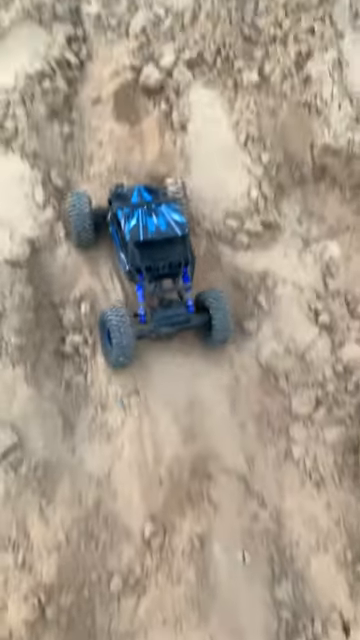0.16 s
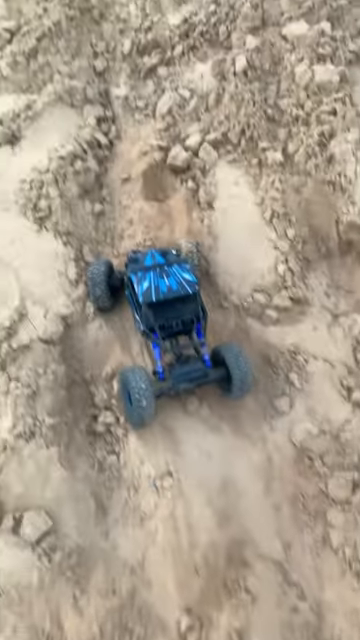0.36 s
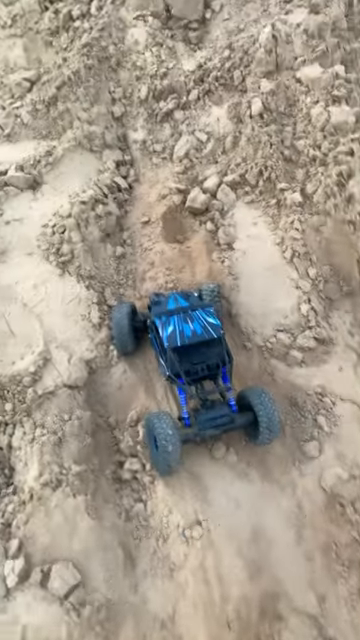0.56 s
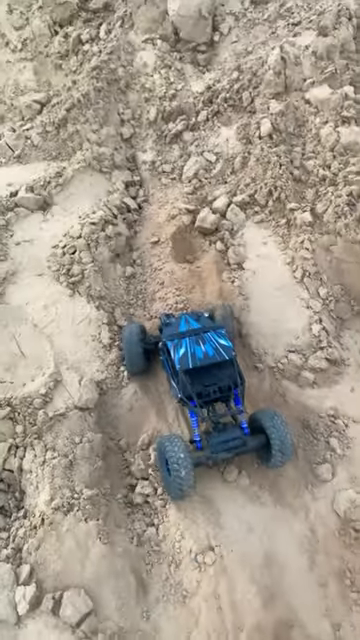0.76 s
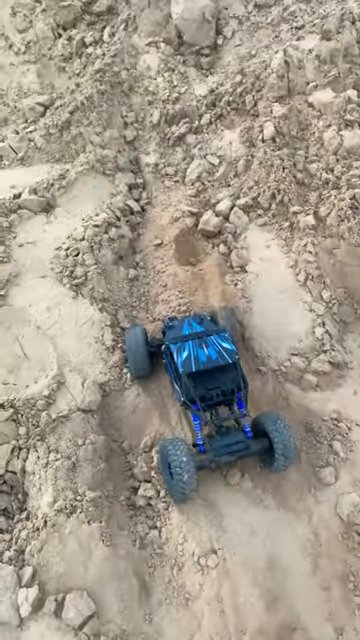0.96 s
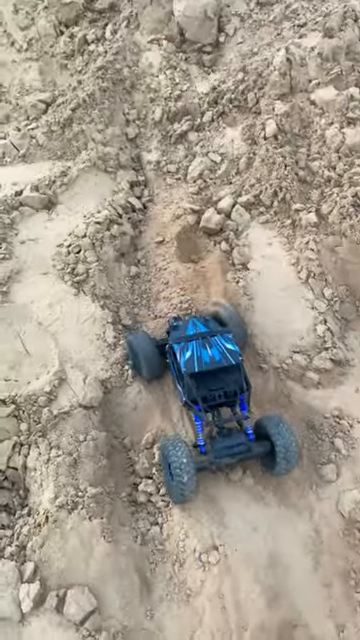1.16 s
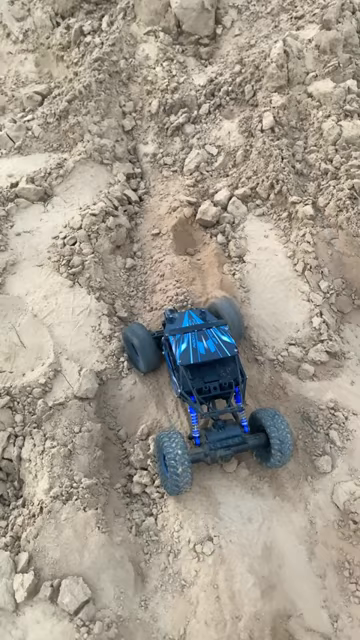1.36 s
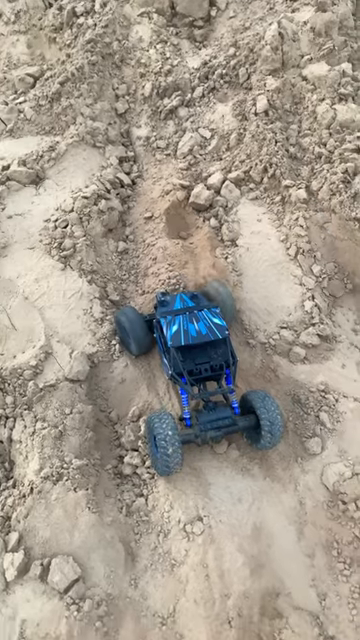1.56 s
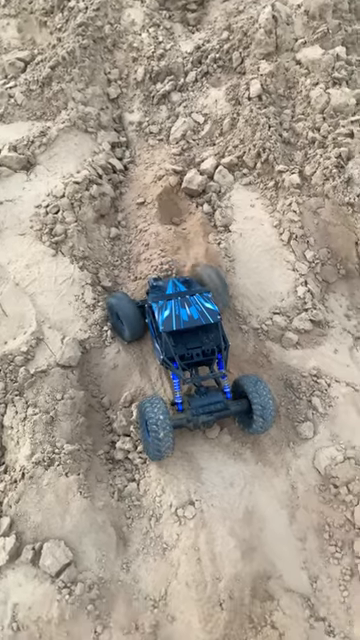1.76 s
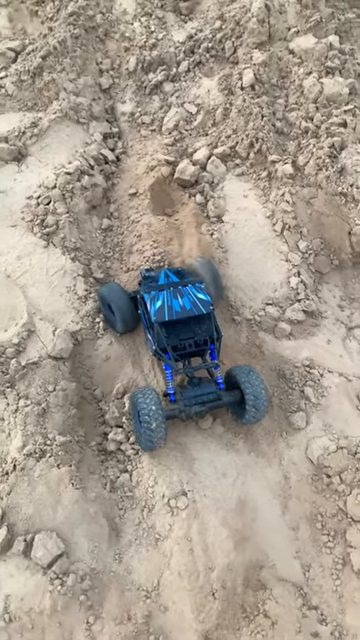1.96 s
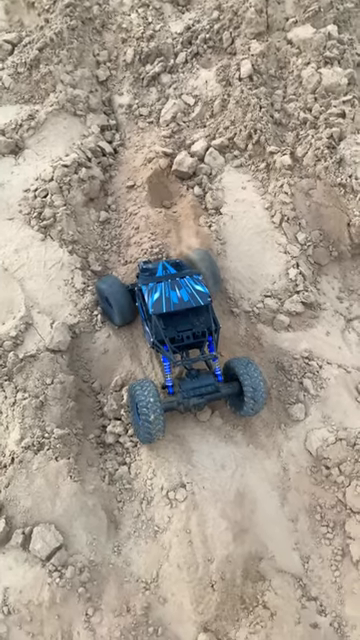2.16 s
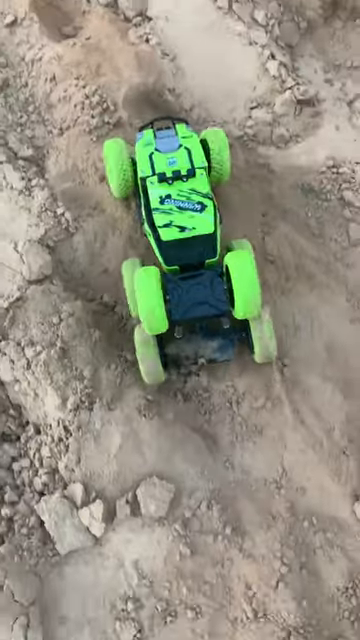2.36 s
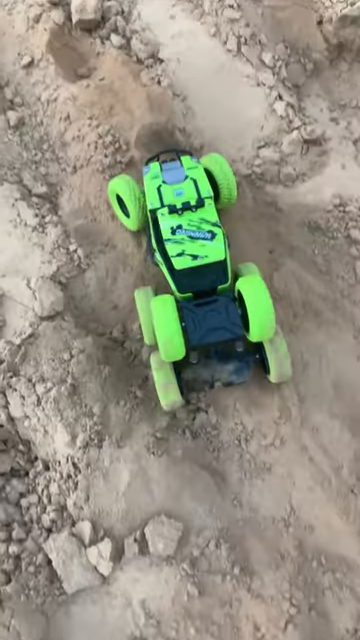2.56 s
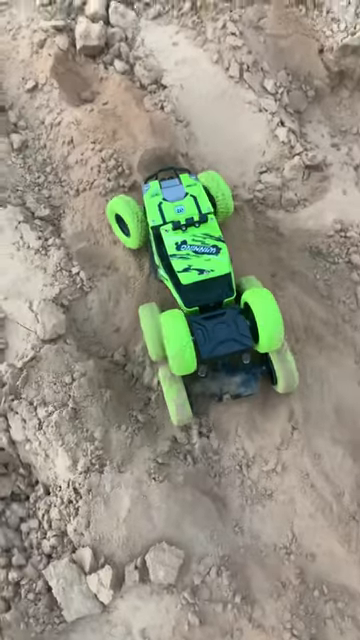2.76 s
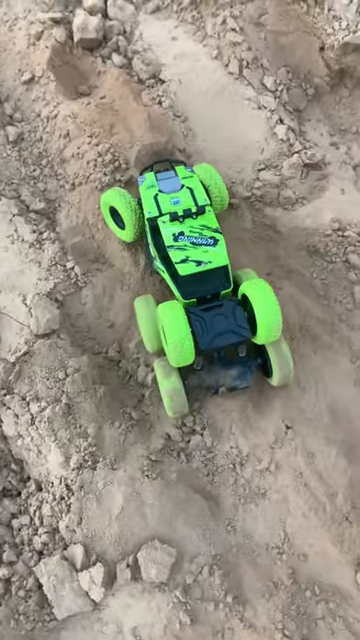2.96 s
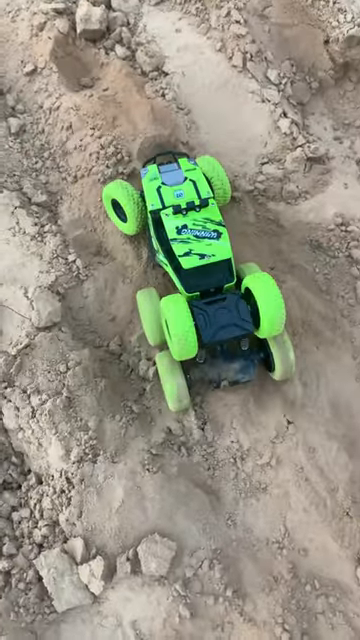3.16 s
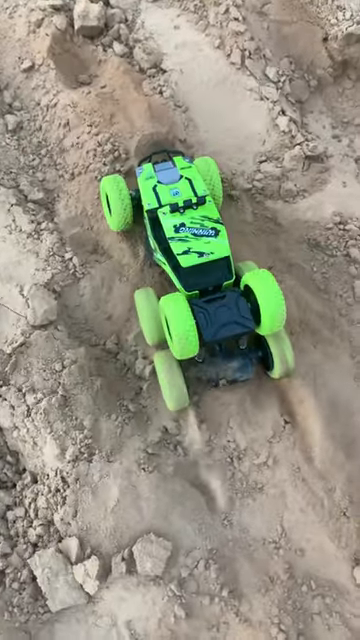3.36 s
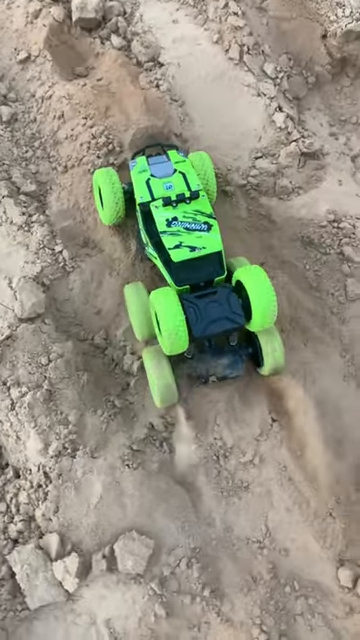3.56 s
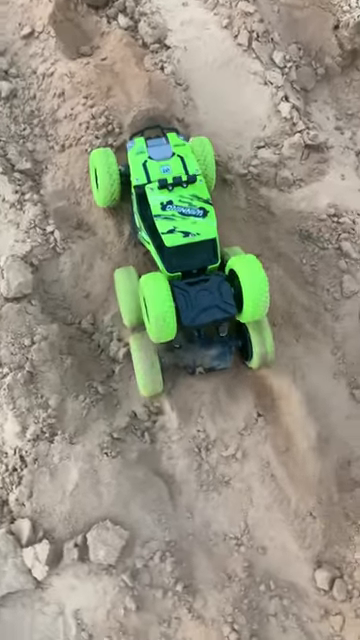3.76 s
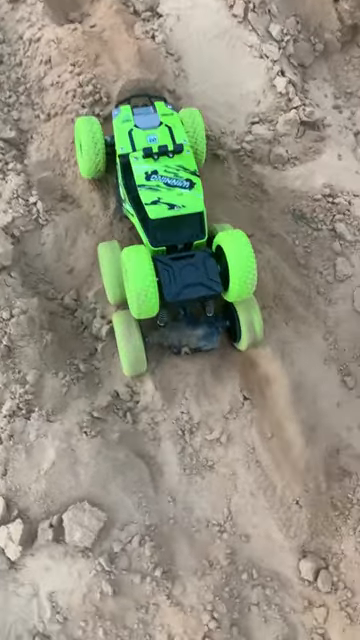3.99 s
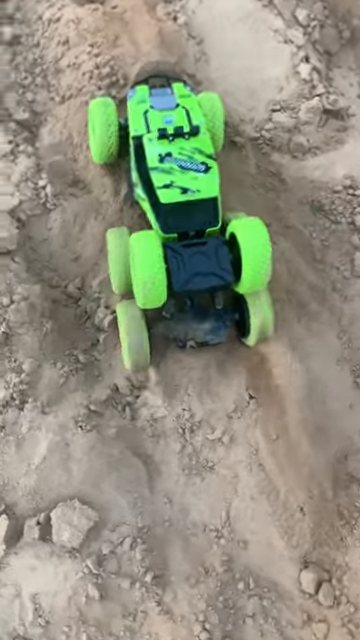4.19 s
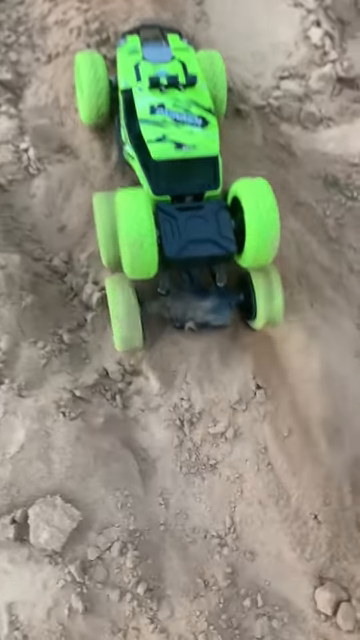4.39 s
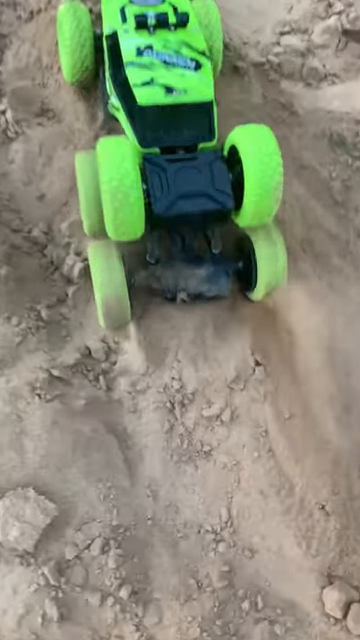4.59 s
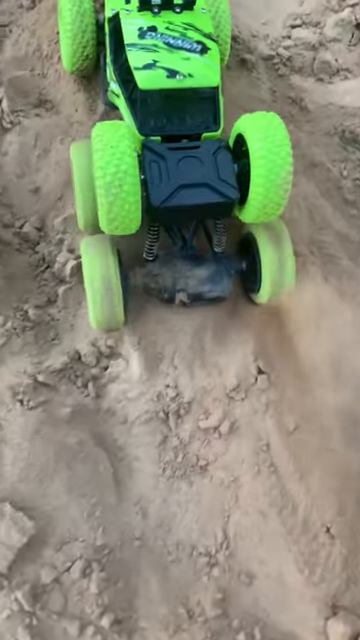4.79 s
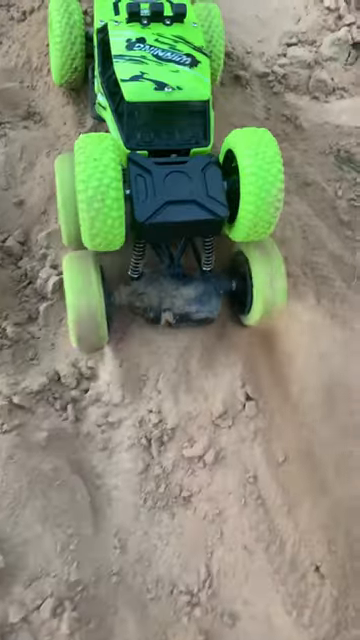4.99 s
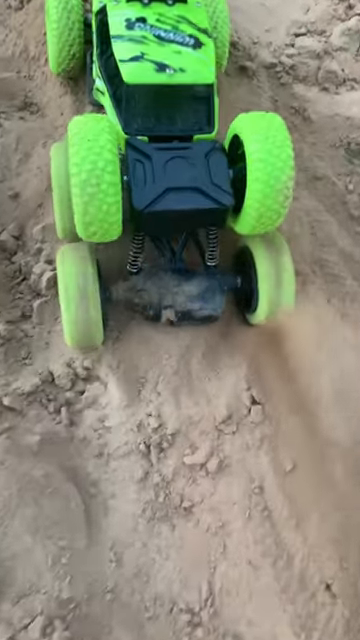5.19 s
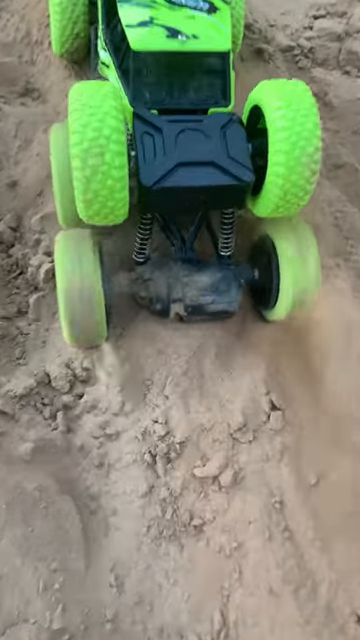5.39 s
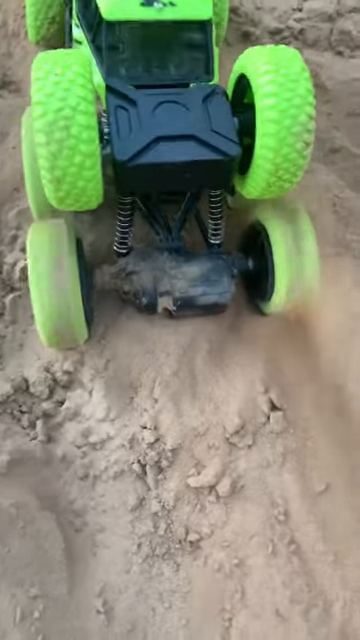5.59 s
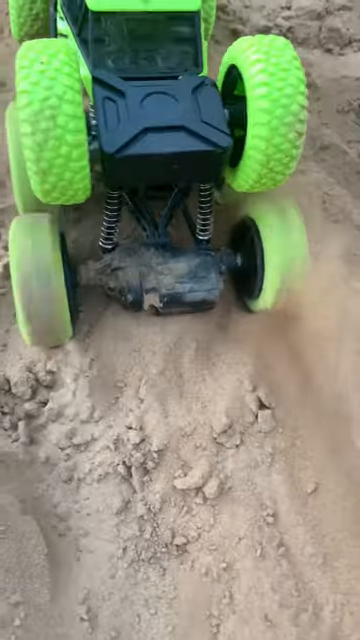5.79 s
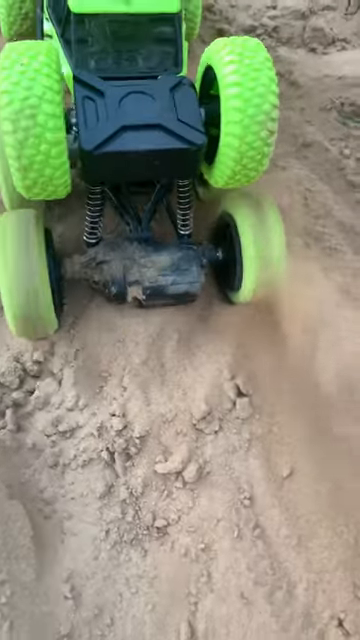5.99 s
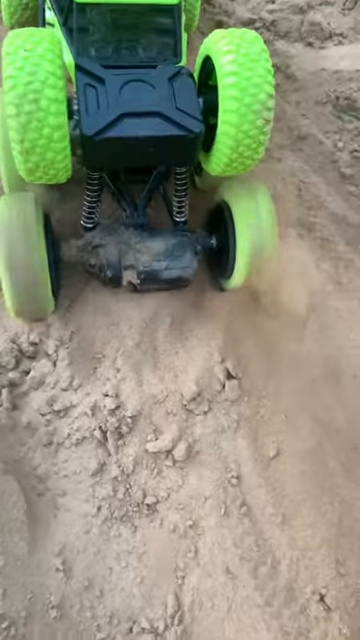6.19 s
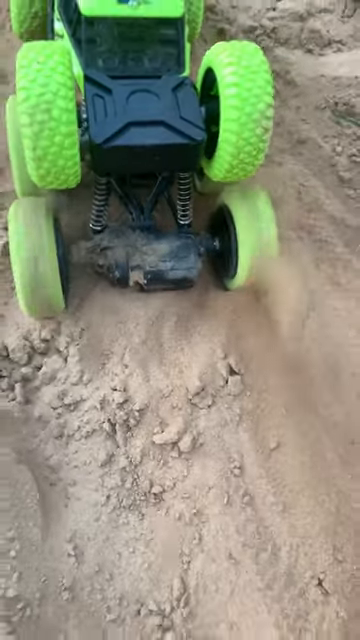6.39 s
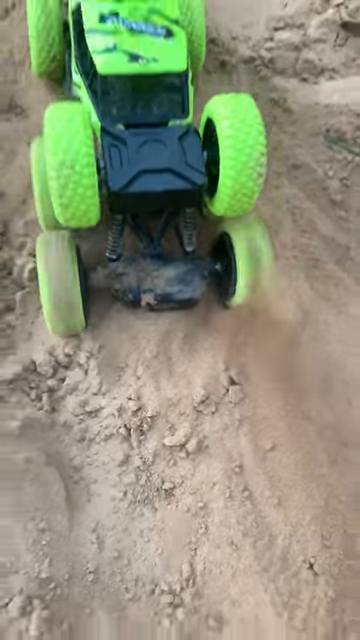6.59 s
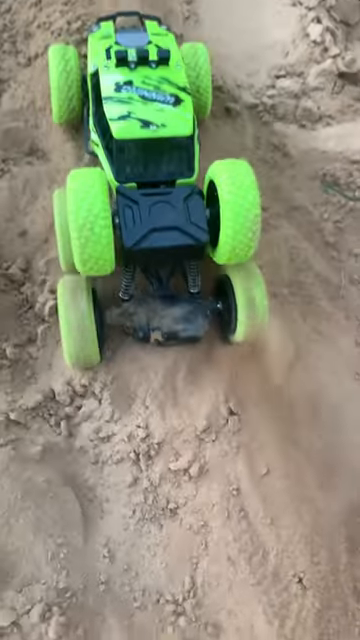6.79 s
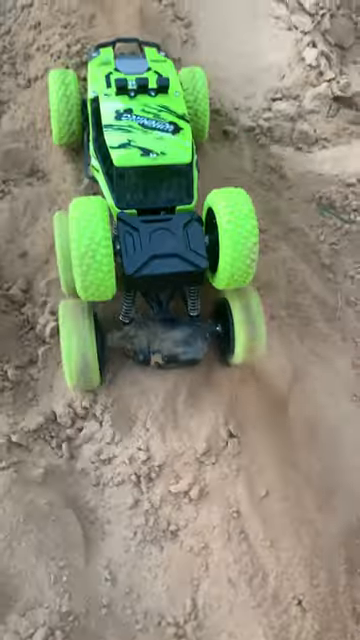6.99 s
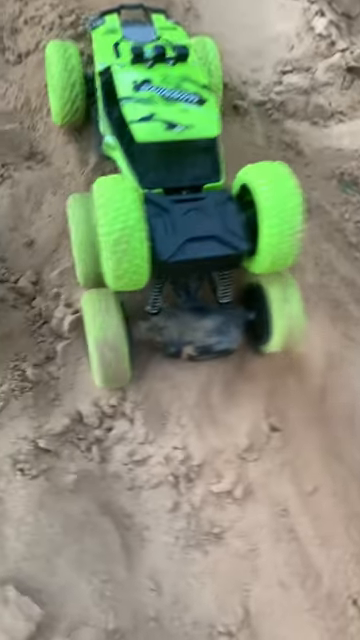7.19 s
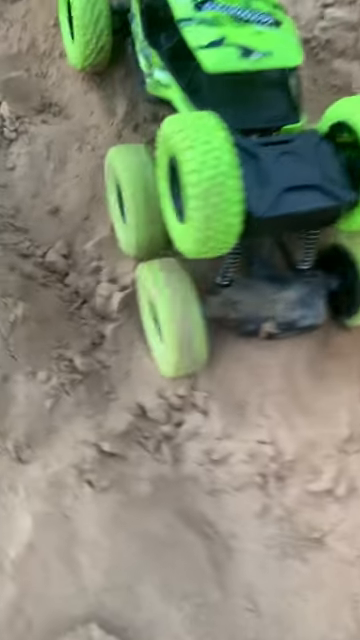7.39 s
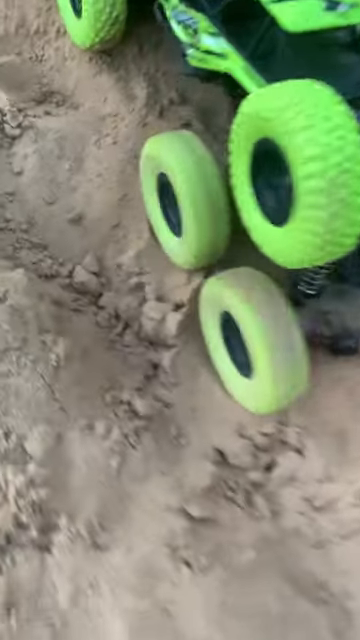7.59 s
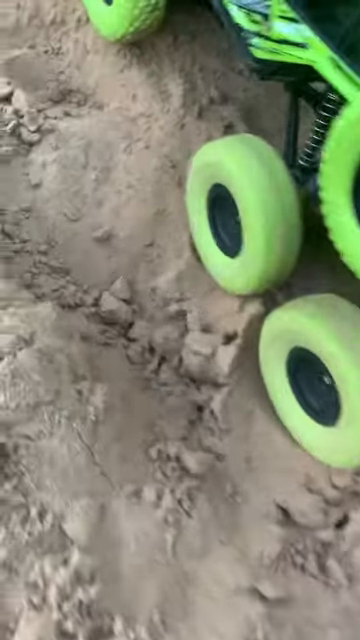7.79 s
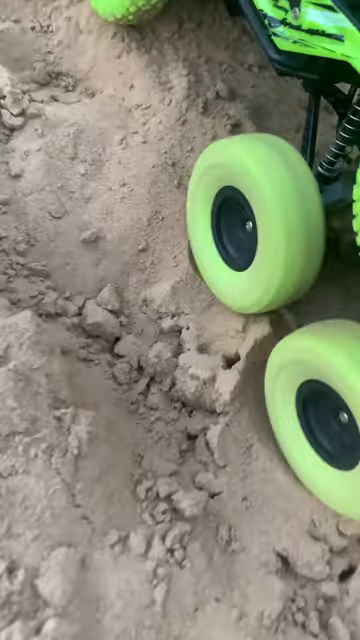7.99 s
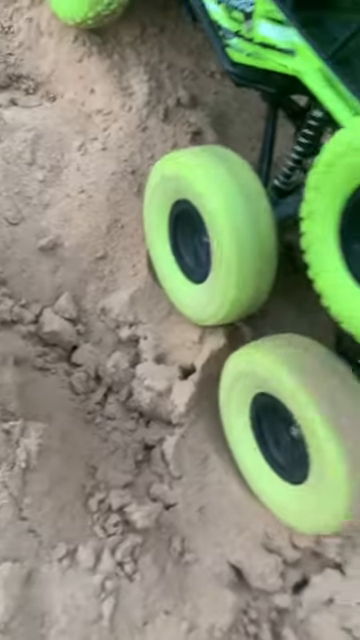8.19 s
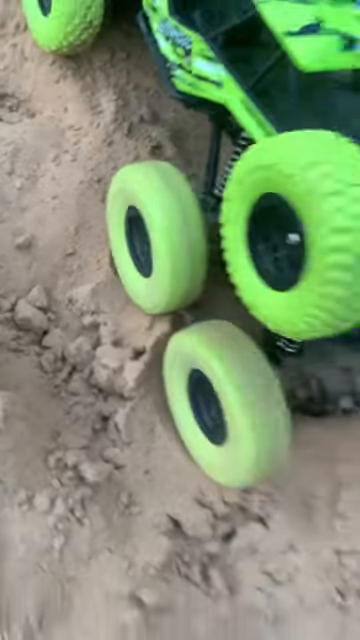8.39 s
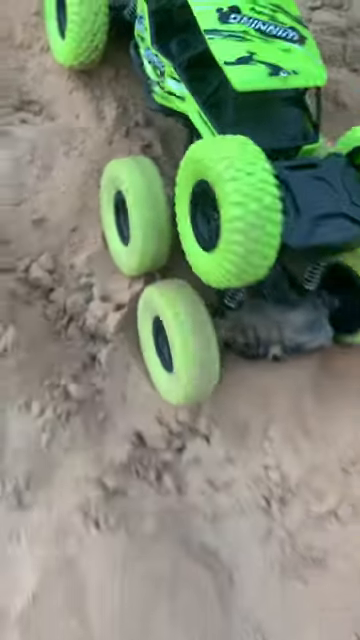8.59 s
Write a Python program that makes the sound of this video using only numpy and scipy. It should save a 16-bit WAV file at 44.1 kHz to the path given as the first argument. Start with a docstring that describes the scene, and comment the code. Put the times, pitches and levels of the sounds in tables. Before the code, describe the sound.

Two toy cars labour on a dusty slope: first gritty tyre scrapes with whining slips, then a throbbing plastic gear rattle growing close and loud.

```python
"""Two toy crawlers on a dusty slope

Close to a two-port microphone, the first car labours in bursts: its tyres scrape grit and its gear whine
shoots up at each slip and sags under load. The second fades in, falters twice, then spins its wheels faster and
nearer, plastic gears rattling, whining and hissing in time with motor, gear and wheel, with extra bright hiss
while it is loud. Knocks ring the plastic and the chassis thuds; behind them lie a distant engine's exhaust
tones, a thin hum and open-air noise.
"""
import sys
import numpy as np
from scipy import signal
from scipy.fft import rfft, irfft, next_fast_len
from scipy.io import wavfile

SR = 44100
rng = np.random.default_rng(int(sys.argv[2]) if len(sys.argv) > 2 else 0)


def output_pcm(signal):
    """Save a mono or channel-first signal as 16-bit PCM at the path in sys.argv[1].

    Samples are clipped to [-1, 1] before scaling.
    """
    pcm = np.clip(np.atleast_2d(signal).T, -1, 1) * 32767
    wavfile.write(sys.argv[1], SR, np.round(pcm).astype(np.int16))


N = 381465
TIME = np.arange(N) / SR
SWAP_S = 2.325  # the first car hands over to the second
SWAP_SAMPLE = round(SWAP_S * SR)

# Second car's drive gear. Each row: time in seconds, turns per second.
GEAR_SPEED = [(2.4, 42), (2.6, 35), (3.07, 37), (3.2, 41.15), (3.6, 43.33), (4.15, 44.13), (4.4, 48.57),
              (4.8, 49.73), (5.5, 49.96), (6.1, 50.38), (6.6, 51.39), (7.2, 52.09), (8.65, 52.02)]
GEAR_TEETH, PINION_TEETH = 37, 9
WHEEL_RATIO = .1604  # wheel turns per gear turn
WHEEL_PHASE_S = 3.2  # gear turns are counted from here
WHEEL_DRAG, GEAR_WOBBLE_TURNS = .0035, .0011  # share of the speed; gear turns
# Dips of speed and level: a short fade-in as the second car enters, then two brief falterings.
# Each row: centre in seconds, depth in dB, ramp either side in seconds.
DIPS = [(2.325, 18, 0.03), (2.911, 12, 0.04), (2.957, 22, 0.04)]
DIP_SPEED_LOSS = .46  # share of the speed lost at the bottom
# Loudness as it gains speed and its distance changes. Each row: time in seconds, level in dB.
APPROACH = [(2.37, -11), (2.5, -14.5), (3.1, -13), (4.15, -7), (4.55, -2.5), (6.1, 1), (6.85, -2.5),
            (7.7, 2), (8.65, 1)]
# How hard its teeth bind, bringing out the whine. Each row: time in seconds, added whine in dB.
BINDING = [(2.9, -14), (4.1, -5), (4.6, -4.5), (5.9, -3), (7, -1), (7.95, -4.5), (8.65, 3)]
RATTLE_DB, WHINE_DB, HISS_DB = -34.5, -34, -30.5  # where approach and binding stand at 0 dB
RATTLE_FOLLOWS, WHINE_FOLLOWS = 0.64, 0.4  # shares of the approach in dB
RATTLE_GEAR_DB, RATTLE_MOTOR_DB = 3.4, 1.7  # weights of gear load and motor load
RUB_GEAR_DB, RUB_MOTOR_DB = 2.2, 1.9
# Plastic housing resonances. Each row: centre in Hz, width in Hz, relative gain in dB.
HOUSING = [(1260, 166, -3.5), (1530, 250, 1), (1820, 247, 0), (2200, 370, -3.5), (3513, 390, -3.5)]
# Housing flank, heard side-on. Each row: centre in Hz, width in Hz, relative gain in dB.
FLANK = [(1621, 79, 0)]
FLANK_DB, FLANK_SWING_DB = -34.5, 3.2
# Hiss of its sliding teeth. Each row: frequency in Hz, relative level per Hz in dB.
HISS = [(150, -17), (350, -7.5), (750, -11.5), (1100, -4.5), (2700, -3.5), (3600, 2), (4400, 5.5),
        (5200, -18), (6400, 6), (7250, -12), (8300, 0.5), (9500, -2), (11000, -9.5), (13000, -21.5),
        (15500, -10)]
# The same hiss from side-on. Each row: frequency in Hz, relative level per Hz in dB.
HISS_SIDE_ON = [(150, -9.5), (350, -8), (750, -13), (1100, -5.5), (4300, 0), (5300, -8.5), (5900, 6.5),
                (7800, -4), (8800, 3), (11000, -8.5), (15500, -10.5)]
TURN_S = (6.96, 7.77)  # start and end of its turn side-on
TOOTH_PLAY, TOOTH_JITTER = .2, .2  # lasting and chance errors of place, tooth spacings
TOOTH_SPREAD_DB = 1.2  # lasting unevenness of strength
TOOTH_DB, GRIT_DB = -2, -5.5  # shares of the rattle: teeth meeting, grit in the gears
TICK_HZ, TICK_WIDTH_HZ, TICK_DB = 3350, 120, -35.5  # gear-case ring; level with the approach at 0 dB
# Extra bright hiss while the second car is loud. Each row: time in seconds, level in dB.
BRIGHT_HISS_LEVEL = [(4.2, -73), (4.6, -45.5), (5.5, -37.5), (6.5, -35.5), (7.1, -57), (7.6, -70)]
# Its colour, strong around 5.7 and 7.4 kHz. Each row: frequency in Hz, relative level per Hz in dB.
BRIGHT_HISS = [(2000, -17), (4800, -24), (5700, 9.5), (6400, -31), (7400, 1), (8500, -2), (15000, -26)]

# First car's throttle. Each row: on in seconds, off in seconds.
THROTTLE = [(0, 0.41), (0.595, 0.652), (0.837, 2.32)]
CRAWL_DB, PICK_UP_DB_PER_S, COAST_DB_PER_S = -35, 447, 113  # scraping while the tyres grip
# Its tyres break loose, then bite. Each row: start in seconds, length in seconds, whine and scrape in dB
# before their layer balance.
SLIPS = [(0, 0.066, -45, -36), (0.106, 0.18, -50, -36), (0.647, 0.074, -50, -39),
         (0.913, 0.13, -39.5, -39.5), (1.045, 0.072, -36, -44), (1.175, .11, -38, -38.5),
         (1.468, 0.062, -40, -33.5), (1.678, 0.049, -49, -33.5), (1.899, .025, -57, -31.5),
         (2.091, 0.04, -51, -32.5), (2.29, 0.0085, -60, -33)]
SLIP_RISE_DB_PER_S, SLIP_FALL_DB_PER_S = 348, 250
SQUEAL_EDGE_DB_PER_S = 380  # the whine stands out only around the slips
# Its tooth rate, racing in slips and sagging as the tyres bite. Each row: time in seconds, rate in Hz.
TOOTH_RATE = [(0, 1299), (.55, 986), (.66, 1830), (.8, 995), (.84, 1460), (.925, 2110), (.98, 1996),
              (1.01, 1750), (1.06, 1957), (1.105, 1735), (1.165, 2102), (1.21, 2045), (1.24, 1840),
              (1.285, 1822), (1.47, 2404), (1.51, 2258), (2.3, 2628)]
# Its tyre scrape. Each row: frequency in Hz, relative level per Hz in dB.
FIRST_SCRAPE = [(250, -25), (680, -16), (1000, -1), (1900, -4), (2350, -0.5), (3300, -4.5), (5000, -6),
                (6700, -15), (8200, -9.5), (11500, -12.5), (13000, -34), (15500, -32)]
# Its shell resonances. Each row: centre in Hz, width in Hz, relative gain in dB.
FIRST_SHELL = [(424, 120, -5), (850, 117, 0), (2800, 300, 2)]
# Gearbox whir while it rolls freely at first. Each row: time in seconds, tone in Hz, level in dB before shares.
WHIR = [(0, 4360, -46), (.07, 4280, -36.5), (.17, 4150, -38.5), (.25, 4430, -37), (.32, 4300, -54),
        (.45, 4000, -68)]
# Its gearbox case. Each row: centre in Hz, width in Hz, relative gain in dB.
WHIR_CASE = [(3220, 250, -7), (4350, 300, 3)]
WHIR_CASE_DB, WHIR_TONE_DB = -1.5, -6  # shares of the whir

# Knocks, and last one strong burst of rattle, ringing the plastic.
# Each row: time in seconds, ring peak in dB, ring in Hz, click level in dB.
KNOCKS = [(0.054, -31, 3900, -18), (0.247, -33, 3900, -21), (0.7475, -28, 4000, -15.5),
          (1.878, -30, 1740, -28), (2.636, -30, 1560, -39), (2.783, -29.5, 1378, -25),
          (2.869, -31, 2115, -45), (2.908, -33, 1350, -51), (3.028, -33, 2100, -43),
          (3.455, -33, 1800, -36), (4.075, -28, 1516, -32), (7.908, -18, 1492, -27)]
# A tooth jumps and hits the case harder. Each row: time in seconds, peak in dB.
JUMPS = [(3.593, -25), (3.732, -28), (3.893, -29), (4.054, -23), (4.164, -31), (4.186, -33)]
# The chassis drops on the ground. Each row: time in seconds, peak in dB, resonance in Hz.
THUDS = [(1.877, -40, 388), (2.3, -43, 810), (2.633, -37.5, 800), (3.803, -42, 449)]

# Distant engine under the first car. Each row: time in seconds, firing rate in Hz, level in dB.
ENGINE_EARLY = [(0, 76, -48), (.4, 74.1, -45.5), (1, 80.46, -46.5), (1.6, 82.1, -60), (1.9, 81.32, -48),
                (2.3, 81.6, -54)]
# Distant engine under the second car. Each row: time in seconds, firing rate in Hz, level in dB.
ENGINE_LATE = [(2.35, 75.14, -42.5), (3.6, 73.72, -44.5), (5, 73.6, -43.5), (7.2, 73.6, -49),
               (8.65, 73.9, -47.5)]
# Its exhaust tones. Each row: multiple of the crank rate, relative dB before and after the tone shifts.
EXHAUST = [(2, 1.5, -2.5), (3, -7, -5.5), (4, -15.5, -12), (5, -16.5, -11.5), (6, -12.5, -10),
           (7, -14, -26), (8, -21, -46)]
TONE_SHIFT_S = (3.6, 3.73)  # start and end of that shift
# A faint far hum that mostly climbs. Each row: time in seconds, frequency in Hz, level in dB.
FAR_HUM = [(4.3, 286.3, -87), (5.3, 299.1, -63), (6.5, 316.6, -59), (7.5, 322.5, -54.5), (8.65, 312.8, -57)]
# Open-air noise. Each row: frequency in Hz, relative level per Hz in dB.
AIR = [(20, -11), (42, -2.5), (75, 7.5), (150, -7.5), (300, -18.5), (700, -21.5), (2000, -7.5), (4000, -25),
       (16000, -60)]

# Level between the microphone ports. Each row: frequency in Hz, left minus right in dB.
PORT_BALANCE = [(60, 0.5), (130, -3.5), (290, -1.5), (640, -9), (1410, -3.5), (3100, -2), (6820, 0),
                (15000, -0.5)]
# Lead of the left port in the treble. Each row: frequency in Hz, phase in radians before unwrapping.
TREBLE_PHASE = [(4500, 2.6), (5300, 3.2), (7200, 5.8), (10300, 7.6), (12400, 9.4), (15200, 12.4)]
# Lead at the first tyres' place, lower range. Each row: frequency in Hz, phase in radians before unwrapping.
FIRST_PHASE = [(100, 0), (400, -.9), (650, -2.3), (760, -1.6), (890, 3.1), (1100, 2.4), (1500, .6),
               (2080, .7), (2270, 3.3), (4000, 1.8)]
# Lead for all other sounds, lower range. Each row: frequency in Hz, phase in radians before unwrapping.
SECOND_PHASE = [(100, 0), (700, -.9), (1030, .9), (2000, .9), (2900, 2.1), (4000, 2)]
CUTOFF_HZ = 15800


def second_car():
    """Off-centre wheel, gear and pinion press the teeth in turn, so rattle, whine and hiss all throb."""
    (speed,), (near_db,), (bind_db,) = in_time(GEAR_SPEED), in_time(APPROACH), in_time(BINDING)
    running = np.ones(N)
    for s, depth_db, ramp_s in DIPS:
        dip = np.maximum(0, 1 - np.abs(TIME - s) / ramp_s)
        speed = speed * (1 - DIP_SPEED_LOSS * dip)
        running = running * from_db(-depth_db * dip)

    gear = turns_of(speed)
    gear = gear - np.interp(WHEEL_PHASE_S, TIME, gear)
    # the wheel's drag varies the speed once per wheel turn
    gear = gear + turns_of(WHEEL_DRAG * speed * cycle(gear * WHEEL_RATIO + .5))
    # the off-centre gear runs unevenly within each turn
    gear = gear + GEAR_WOBBLE_TURNS * cycle(gear)
    motor = gear * GEAR_TEETH / PINION_TEETH
    wheel_load = cycle(gear * WHEEL_RATIO + .106)
    motor_load = cycle(motor + .1)
    # the gear's tight side bites suddenly and lets go slowly
    gear_load = np.tanh(2 * cycle(gear + .28) + .5 * cycle(2 * gear - .17))

    # loose teeth and grit knock on the housing
    force_db = 1.21 * wheel_load + RATTLE_GEAR_DB * gear_load + RATTLE_MOTOR_DB * motor_load
    grit = grains(per_s=9000, spread_db=0.5)
    blows = from_db(TOOTH_DB) * tooth_blows(gear) + from_db(GRIT_DB) * grit
    blows = blows * from_db(force_db)
    rattle = body(blows, HOUSING)
    flank = body(blows * from_db(FLANK_SWING_DB * (wheel_load + .5 * gear_load)), FLANK)

    # backlash blurs the tooth rate; entering and leaving teeth sound at its double
    teeth = gear * GEAR_TEETH + .11 * drift(45)
    whine = cycle(2 * teeth) * (1 + .4 * drift(250))
    pressure_db = 3 * wheel_load + 7 * gear_load + 6 * motor_load + 2 * drift(20)
    whine = rms_one(whine * from_db(pressure_db))

    rub_db = wheel_load + RUB_GEAR_DB * gear_load + RUB_MOTOR_DB * motor_load
    slide = grains(per_s=9000, spread_db=3.5) * from_db(rub_db + 0.58 * drift(13))
    side_on = np.interp(TIME, TURN_S, [0, 1])
    hiss = (1 - side_on) * colour(slide, HISS) + side_on * colour(slide, HISS_SIDE_ON)

    # the motor sings thinly on a high multiple of its speed, fading as the car turns side-on
    sing = from_db(-9) * cycle(39 * motor + .2 * drift(60))
    sing = sing * from_db(2.5 * drift(100) + 2 * gear_load) * (1 - side_on)
    sing *= np.interp(speed, [47.5, 50.4], [0, 1])  # only near full speed

    car = (from_db(RATTLE_DB + RATTLE_FOLLOWS * near_db) * rattle
           + from_db(TICK_DB + near_db) * pinion_ticks(motor, gear_load, speed)
           + from_db(FLANK_DB) * side_on * flank
           + from_db(WHINE_DB + WHINE_FOLLOWS * near_db + bind_db) * whine
           + from_db(HISS_DB + near_db) * (hiss + sing))
    return car * running * (np.arange(N) >= SWAP_SAMPLE)


def tooth_blows(gear):
    """One blow per tooth, each tooth with lasting strength and play; chance shifts every blow."""
    first = np.ceil(gear[0] * GEAR_TEETH) + 1
    tooth = np.arange(first, gear[-1] * GEAR_TEETH - 1).astype(int)
    play, strength = rng.standard_normal((2, GEAR_TEETH))[:, tooth % GEAR_TEETH]
    place = tooth + TOOTH_PLAY * play + TOOTH_JITTER * rng.standard_normal(len(tooth))
    at = np.interp(place / GEAR_TEETH, gear, np.arange(N)).astype(int)
    blows = np.bincount(at, from_db(TOOTH_SPREAD_DB * strength), N)
    return rms_one(blows - blows.mean())


def pinion_ticks(motor, gear_load, speed):
    """A straining pinion ticks on the case once per motor turn, hardest on the gear's tight side."""
    count = np.floor(motor - .05 + .015 * drift(150))
    blows = np.diff(count, prepend=np.floor(motor[0])) > 0
    force = from_db(6 * gear_load + 2 * drift(60))
    ring = rms_one(resonate(blows * force, TICK_HZ, TICK_WIDTH_HZ))
    return ring * np.interp(speed, [38, 43, 46, 49], [0, 1, 1, 0])  # only below full speed


def bright_hiss():
    """Extra bright hiss while the second car is loud: dense random impacts in two treble bands."""
    level_db, = in_time(BRIGHT_HISS_LEVEL)
    return from_db(level_db) * colour(grains(per_s=9400, spread_db=-6), BRIGHT_HISS)


def first_car():
    """Tyres scrape grit and shake the shell; at each slip the gear whine shoots up, then sags under load."""
    bursts = [held(on, off, PICK_UP_DB_PER_S, COAST_DB_PER_S) for on, off in THROTTLE]
    crawl = from_db(CRAWL_DB) * np.max(bursts, axis=0)
    power, squeal = crawl ** 2, 0
    for s, length, whine_db, scrape_db in SLIPS:
        slip = held(s, s + length, SLIP_RISE_DB_PER_S, SLIP_FALL_DB_PER_S)
        power = power + (from_db(scrape_db) * slip) ** 2
        edge = held(s, s + length, SQUEAL_EDGE_DB_PER_S, SQUEAL_EDGE_DB_PER_S)
        squeal = np.maximum(squeal, from_db(whine_db) * edge)

    tooth_hz, = in_time(TOOTH_RATE)
    teeth = turns_of(tooth_hz * (1 + .006 * drift(50)))
    overtone = cycle(2 * teeth) * drift(230)  # uneven teeth smear the overtone
    whine = rms_one(cycle(teeth) + from_db(-7) * overtone)
    whine = whine * from_db(-3.5 + 3.2 * drift(50))

    grip = from_db(1.9 * drift(43) + 1.7 * cycle(teeth / PINION_TEETH))
    scrape = colour(grains(per_s=7000, spread_db=1.0) * grip, FIRST_SCRAPE)
    shell = body(grains(per_s=1100, spread_db=3.0) * grip, FIRST_SHELL)  # lumps of earth under the tread
    tyres = np.sqrt(power) * (from_db(-3.5) * scrape + from_db(-10.0) * shell)
    return np.array([tyres, squeal * whine + whir()]) * (np.arange(N) < SWAP_SAMPLE)


def whir():
    """The unloaded gearbox: a thin gliding tone over teeth ticking on the case."""
    hz, level_db = in_time(WHIR)
    tone = cycle(turns_of(hz * (1 + .008 * drift(120))))
    tone = rms_one(tone * from_db(3 * drift(150)))
    case = body(grains(per_s=4200, spread_db=0), WHIR_CASE)
    return from_db(level_db) * (from_db(WHIR_TONE_DB) * tone + from_db(WHIR_CASE_DB) * case)


def knocks():
    """Sharp snaps with a short plastic ring, bright ticks of jumping teeth, dull thuds of the chassis."""
    out, age = np.zeros(N), TIME[:4096]
    for s, ring_db, hz, click_db in KNOCKS:
        crunch = rng.standard_normal(len(age))
        ring = resonate(crunch * np.exp(-age * hz / 4), hz, width_hz=hz / 10)
        ring = resonate(ring, hz, width_hz=hz / 2)
        snap = crunch * np.exp(-age / .0003)
        click = resonate(snap, 8400, width_hz=2600) + .5 * resonate(snap, 1800, width_hz=2600)
        add(out, s, ring_db, ring)
        add(out, s, click_db, click)
    for s, peak_db in JUMPS:
        add(out, s, peak_db, resonate(age == 0, TICK_HZ, TICK_WIDTH_HZ))
    for s, thud_db, hz in THUDS:
        crunch = rng.standard_normal(len(age)) * np.exp(-age / 0.013)
        thud = resonate(resonate(crunch, hz, width_hz=hz / 2), hz, width_hz=hz / 2)
        add(out, s, thud_db, thud)
    return out


def engine():
    """A far engine: at first almost only its firing note, then the whole low row of exhaust harmonics."""
    firing_hz, level_db = in_time(list(ENGINE_EARLY) + list(ENGINE_LATE))
    crank = turns_of(firing_hz / 2 * (1 + 0.0055 * drift(4.4)))  # two firings per crank turn
    opened = np.where(TIME < SWAP_S, from_db(-47), 1)
    lines = 0
    for multiple, *shift_db in EXHAUST:
        k = round(multiple)
        line_db = np.interp(TIME, TONE_SHIFT_S, shift_db) + 2.0 * drift(5.2)
        line = from_db(line_db) * cycle(k * crank + rng.random())
        lines = lines + line * (opened if k > 2 else 1)
    return from_db(level_db) * lines


def far_hum():
    """A thin tone behind the engine, wavering in pitch and level."""
    hz, level_db = in_time(FAR_HUM)
    hum = cycle(turns_of(hz * (1 + 0.0089 * drift(10.0))))
    return from_db(level_db + 2 * drift(14.0)) * hum


def open_air():
    """Steady background air: random noise with a low-heavy colour."""
    return from_db(-50.5) * colour(rng.standard_normal(N), AIR)


def ports(x, low_phase):
    """Two ports hear a sound a little apart; rough ground scatters some back by ever-changing paths."""
    sides = np.array([[1], [-1]])  # left, right
    phase = np.array(list(low_phase) + list(TREBLE_PHASE))
    phase[:, 1] = np.unwrap(phase[:, 1])

    def response(hz):
        """Half the level and phase difference goes to each port, with opposite signs."""
        gain = from_db(sides * at_hz(PORT_BALANCE, hz) / 2)
        return gain * np.exp(.5j * sides * at_hz(phase, hz))

    direct = filtered(x, response)
    echoes = rng.standard_normal((2, 1024)) * np.exp(-TIME[:1024] / 0.0037)
    echoes /= np.sqrt(np.sum(echoes ** 2, axis=1, keepdims=True))
    bright = signal.sosfilt(signal.butter(2, 400, "high", fs=SR, output="sos"), x)
    scatter = signal.fftconvolve(bright[None], echoes, axes=1)[:, :N]
    scatter = scatter * np.array([drift(17.2), drift(19.7)])
    return direct + from_db(-11) * scatter


def body(blows, modes):
    """Blows ring a set of resonances, alternating in sign; rms 1."""
    rings = 0
    for k, (hz, width_hz, db) in enumerate(modes):
        rings = rings + (-1) ** k * from_db(db) * resonate(blows, hz, width_hz)
    return rms_one(rings)


def resonate(x, hz, width_hz):
    """One two-pole resonance with gain near 1 on top."""
    r = np.exp(-np.pi * width_hz / SR)
    zeros = np.array([1, 0, -1]) * (1 - r * r) / 2
    poles = [1, -2 * r * np.cos(2 * np.pi * hz / SR), r * r]
    return signal.lfilter(zeros, poles, x + 1e-18)


def grains(per_s, spread_db):
    """Random tiny impacts of uneven size and either sign; rms 1."""
    size = from_db(spread_db * np.clip(rng.standard_normal(N), -2, 2))
    size = size * rng.choice([-1, 1], N)
    return rms_one(size * (rng.random(N) < per_s / SR))


def drift(rate):
    """Smooth random wander of spread 1, quicker at a higher rate."""
    r = np.exp(-40 * np.pi * rate / SR)  # run on every 20th sample
    noise = rng.standard_normal(N // 20 + 4002)
    slow = signal.lfilter([1], [1, -2 * r, r * r], noise)[4000:]  # drop the settling
    return np.interp(np.arange(N) / 20, np.arange(len(slow)), rms_one(slow))


def colour(x, spectrum):
    """Give x a spectrum; rms 1."""
    return rms_one(filtered(x, lambda hz: from_db(at_hz(spectrum, hz))))


def filtered(x, response):
    """Apply a frequency response, given as a function of Hz."""
    size = next_fast_len(N + 4096)
    hz = np.arange(size // 2 + 1) * SR / size
    return irfft(rfft(x, size) * response(hz), size)[..., :N]


def held(start, end, rise_db_per_s, fall_db_per_s):
    """Gain that swells to 1 at the start, holds, and dies away after the end."""
    ramps_db = np.minimum(rise_db_per_s * (TIME - start), fall_db_per_s * (end - TIME))
    return from_db(np.clip(ramps_db, -200, 0))


def add(out, s, peak_db, sound):
    """Mix in a short sound at a time and peak level."""
    at = int(s * SR)
    out[at:at + len(sound)] += from_db(peak_db) * sound[:N - at] / np.abs(sound).max()


def turns_of(rate):
    """Turns made at a rate per second."""
    return np.cumsum(rate) / SR


def cycle(turns):
    """One cosine per turn."""
    return np.cos(2 * np.pi * turns)


def in_time(rows):
    """Each column of a curve at every sample."""
    s, *columns = np.transpose(rows)
    return [np.interp(TIME, s, column) for column in columns]


def at_hz(points, hz):
    """Read a table on a log-frequency axis."""
    f, value = np.transpose(points)
    return np.interp(np.log(hz + 1), np.log(f), value)


def from_db(db):
    """Decibels to gain."""
    return 10 ** (np.asarray(db) / 20)


def rms_one(x):
    """Scale to unit power."""
    return x / np.sqrt(np.mean(x ** 2) + 1e-20)


def scene():
    """Both cars close by, the bright hiss and knocks, then the engine, far hum and open air."""
    tyres, gearbox = first_car()
    rest = second_car() + gearbox + bright_hiss() + knocks() + engine() + far_hum() + open_air()
    return ports(tyres, FIRST_PHASE) + ports(rest, SECOND_PHASE)


def record(dry):
    """The deepest rumble is rolled off and the top is cut steeply."""
    dry = signal.sosfilt(signal.butter(3, 31, "high", fs=SR, output="sos"), dry)
    return signal.sosfilt(signal.ellip(10, .1, 80, CUTOFF_HZ, fs=SR, output="sos"), dry)


dry = scene()
out = record(dry)
output_pcm(out)
```